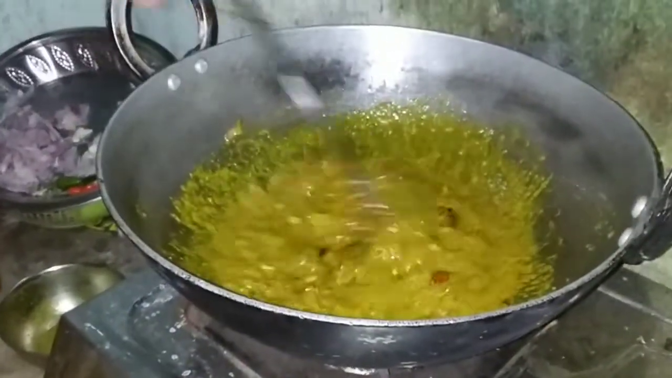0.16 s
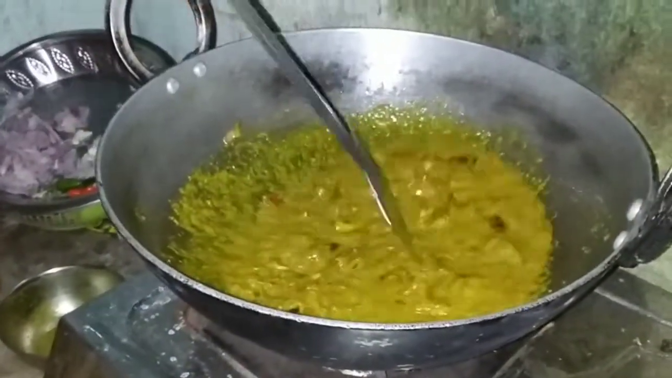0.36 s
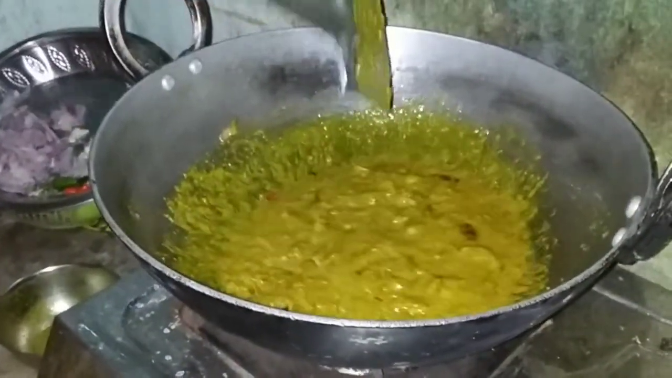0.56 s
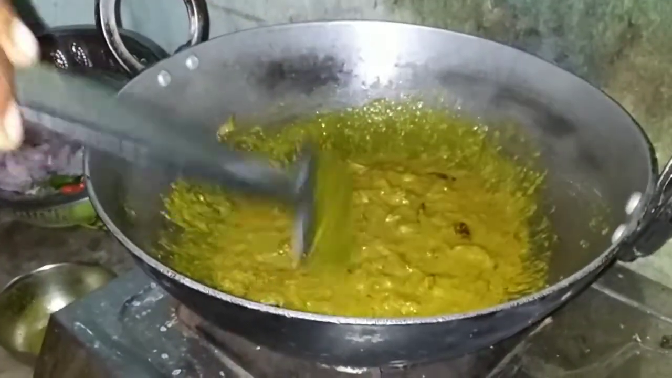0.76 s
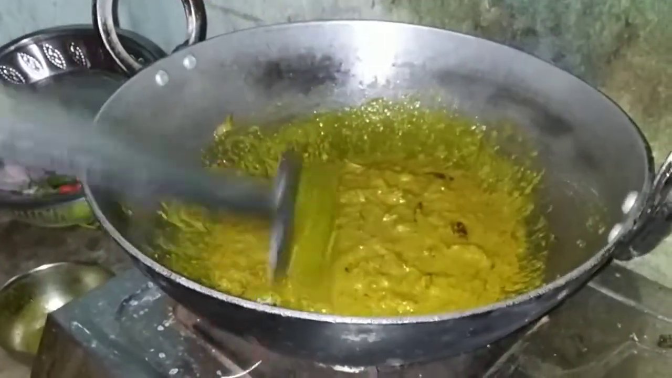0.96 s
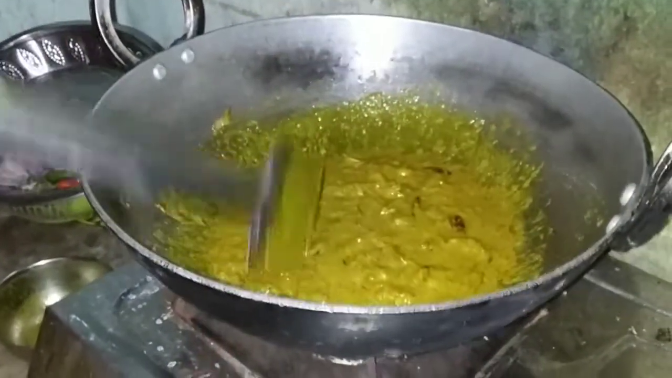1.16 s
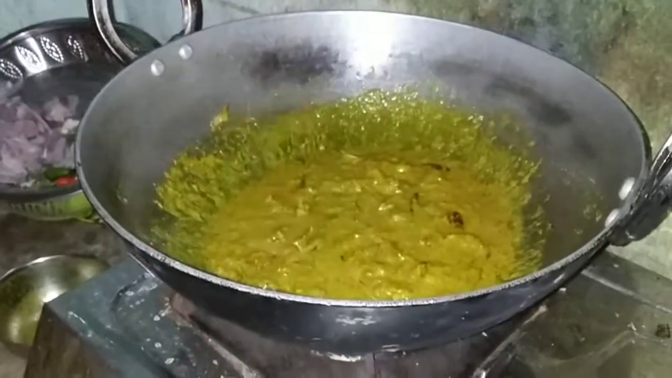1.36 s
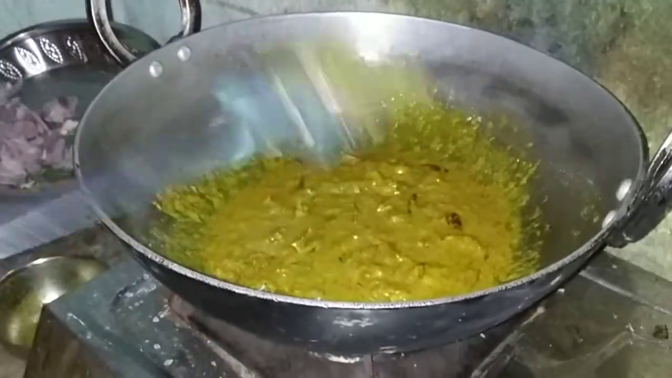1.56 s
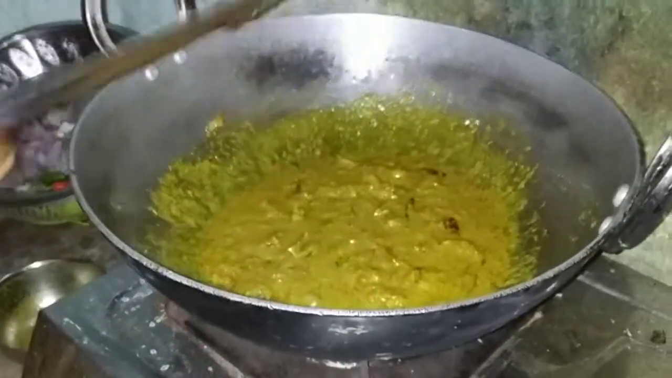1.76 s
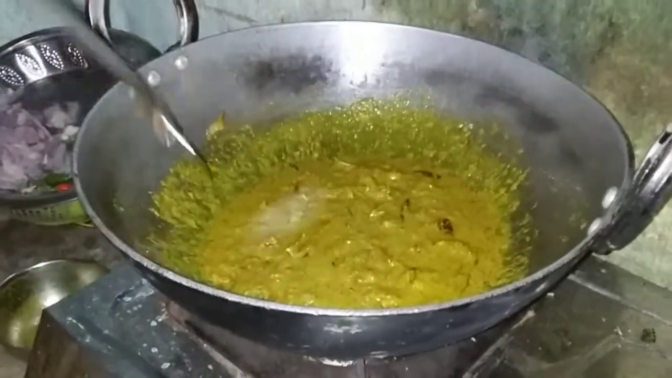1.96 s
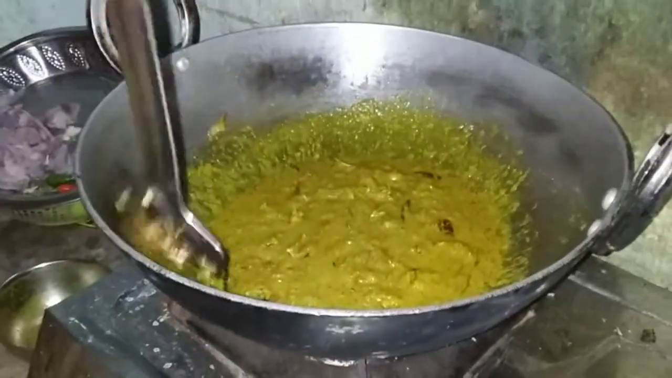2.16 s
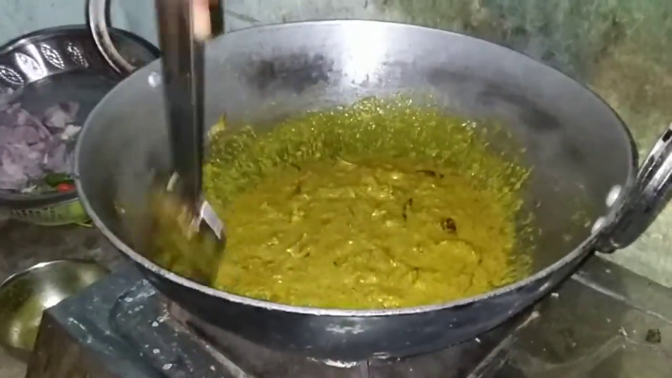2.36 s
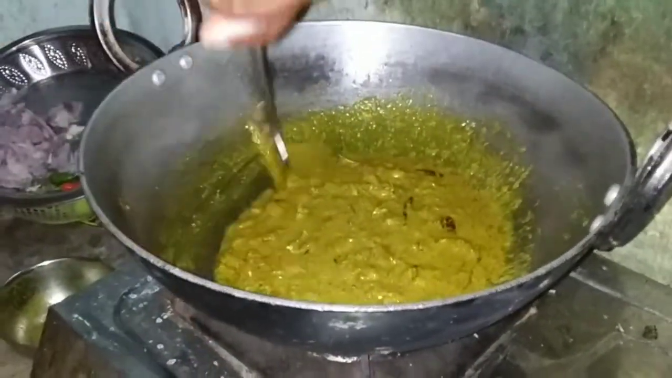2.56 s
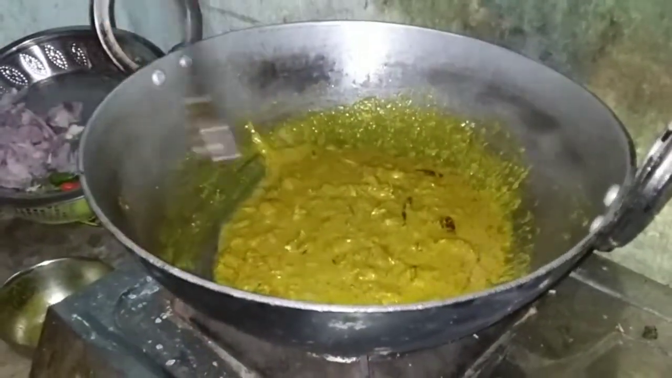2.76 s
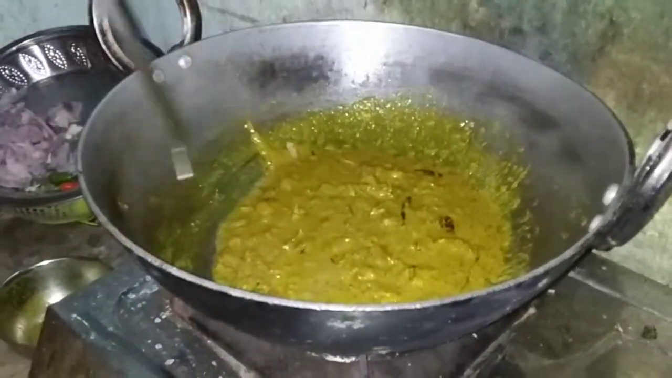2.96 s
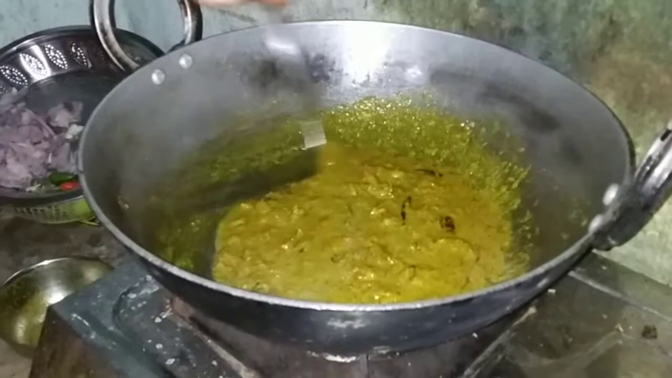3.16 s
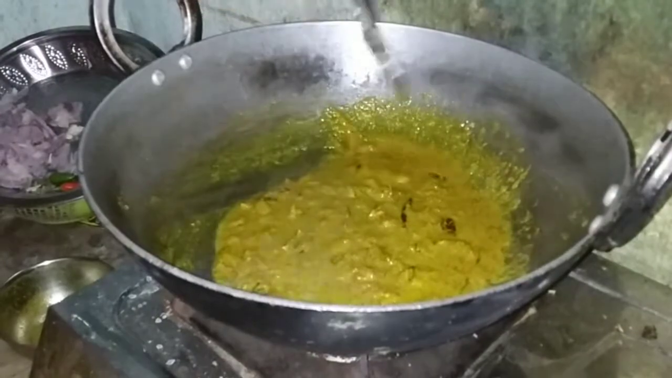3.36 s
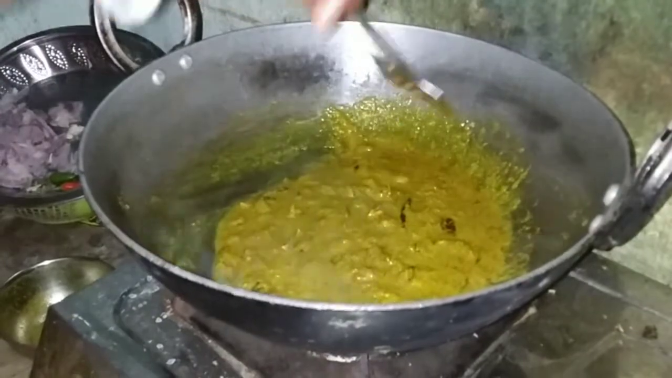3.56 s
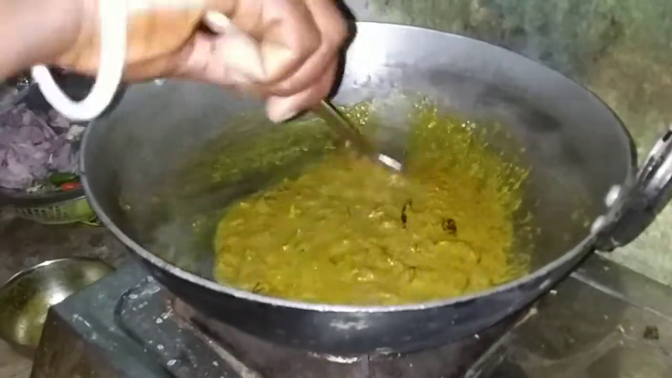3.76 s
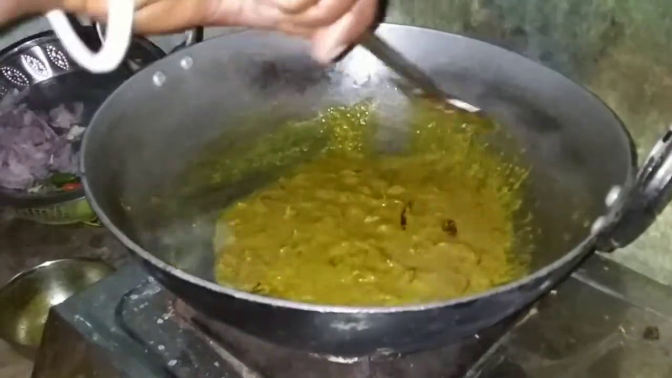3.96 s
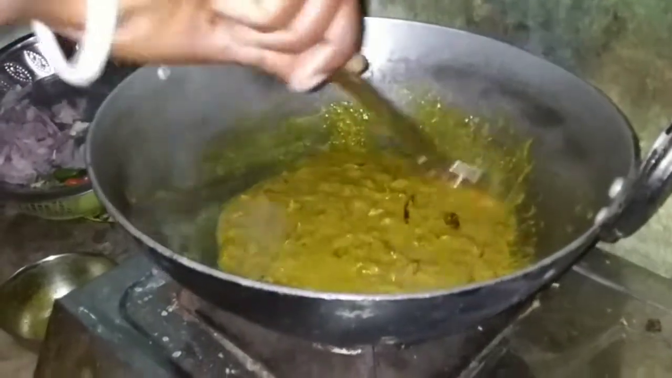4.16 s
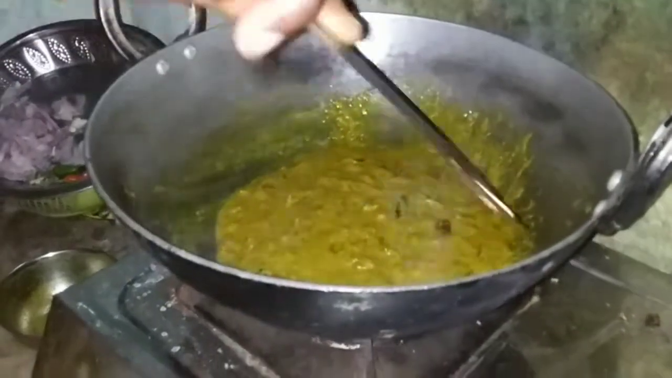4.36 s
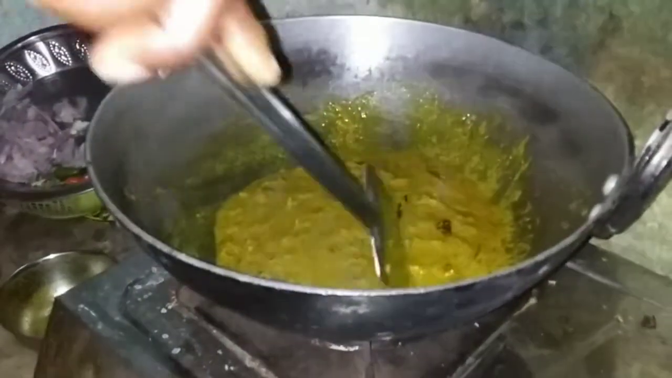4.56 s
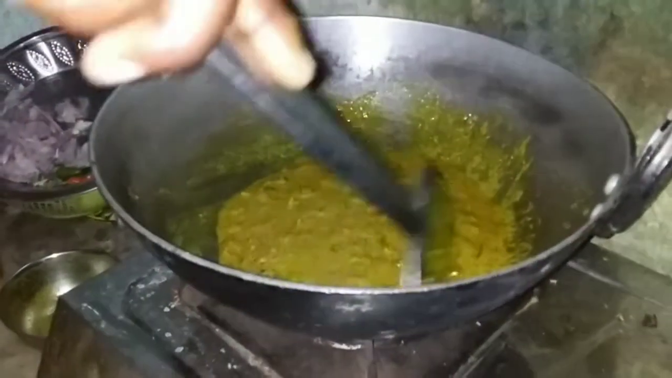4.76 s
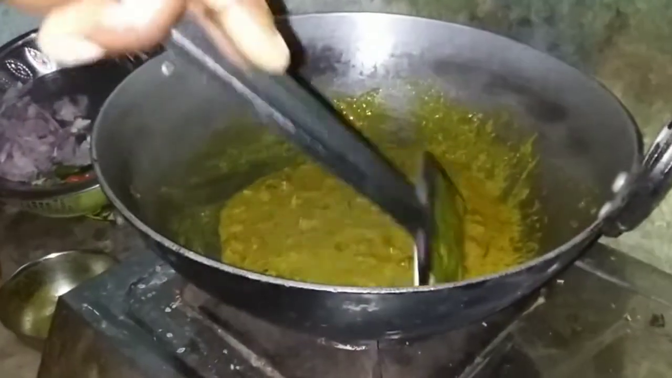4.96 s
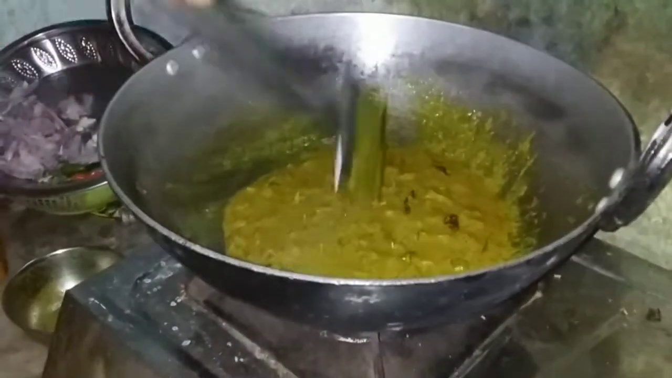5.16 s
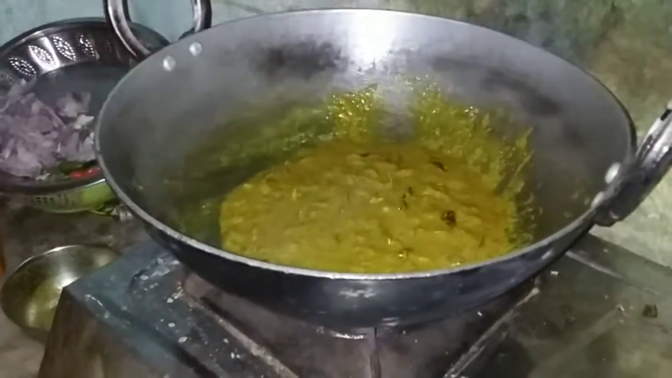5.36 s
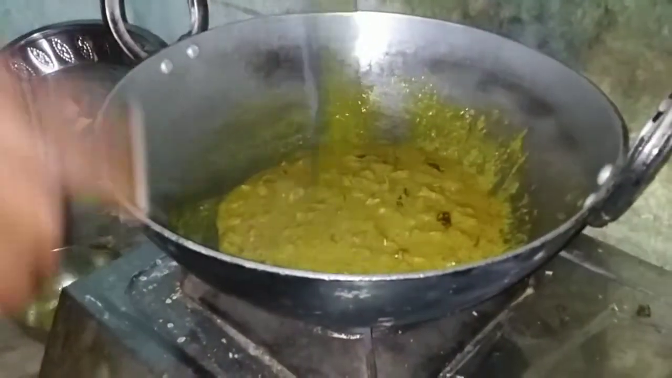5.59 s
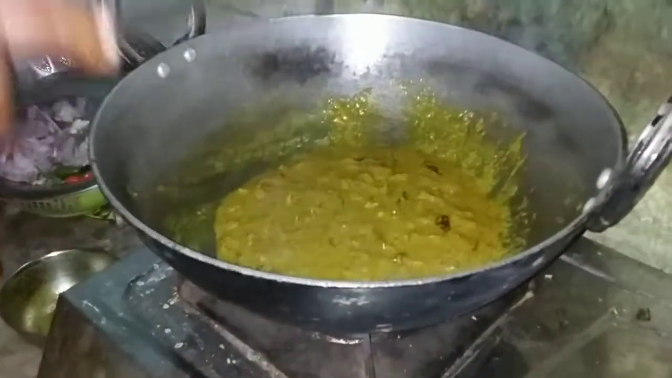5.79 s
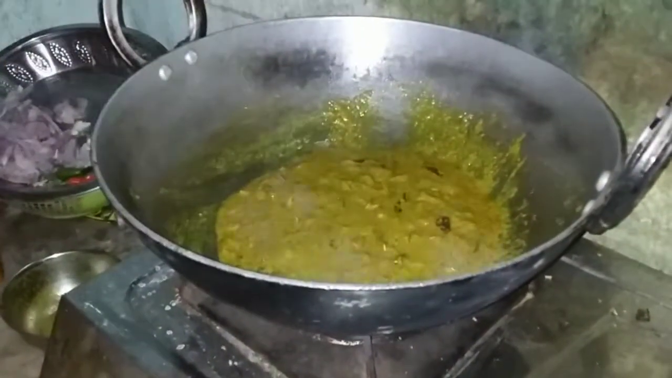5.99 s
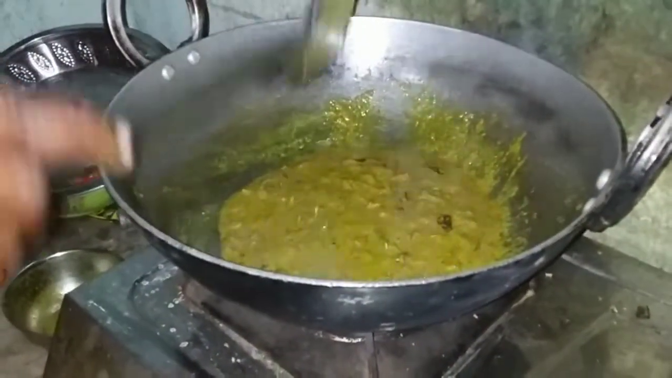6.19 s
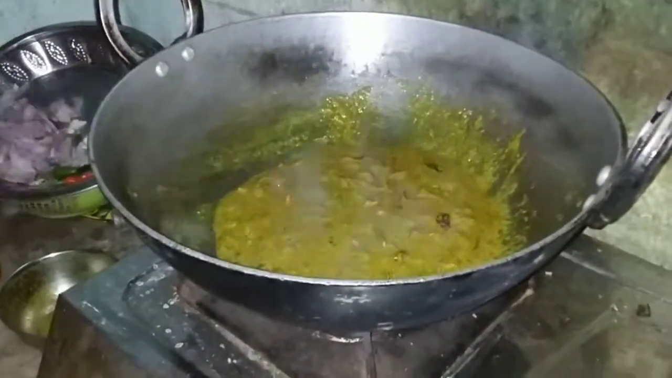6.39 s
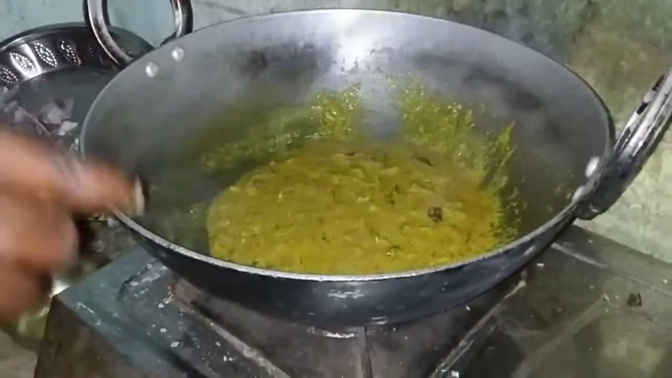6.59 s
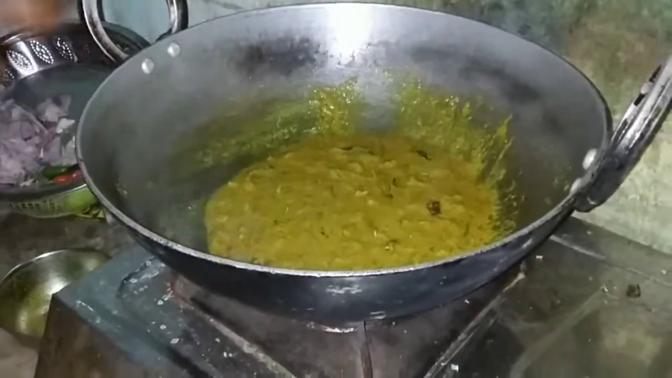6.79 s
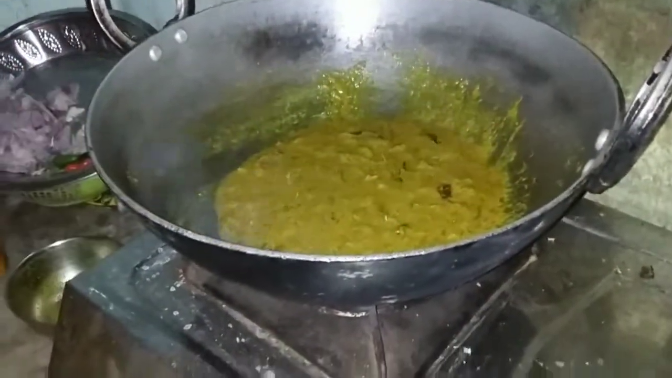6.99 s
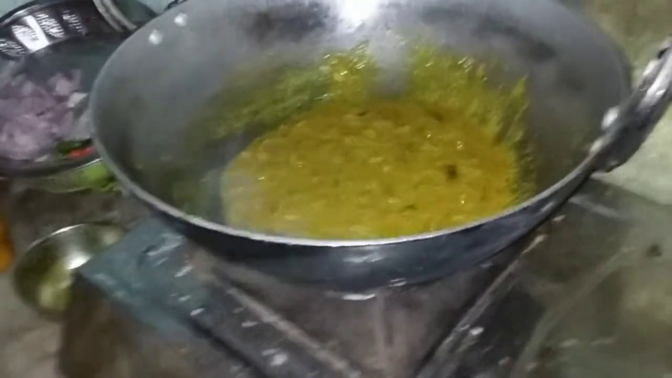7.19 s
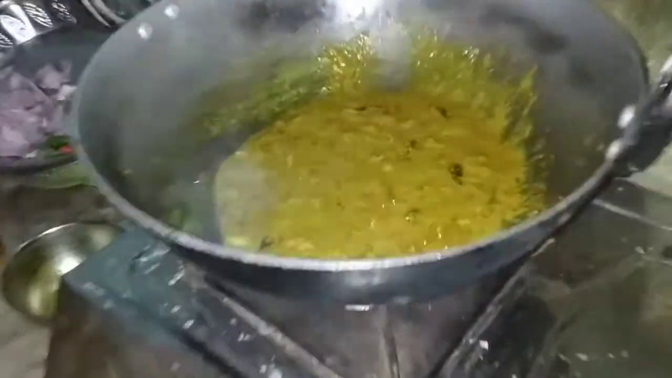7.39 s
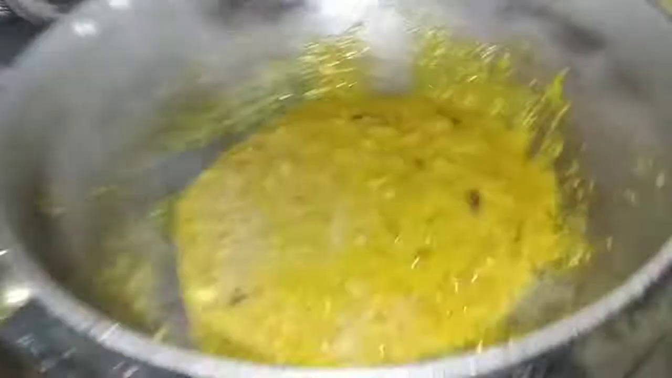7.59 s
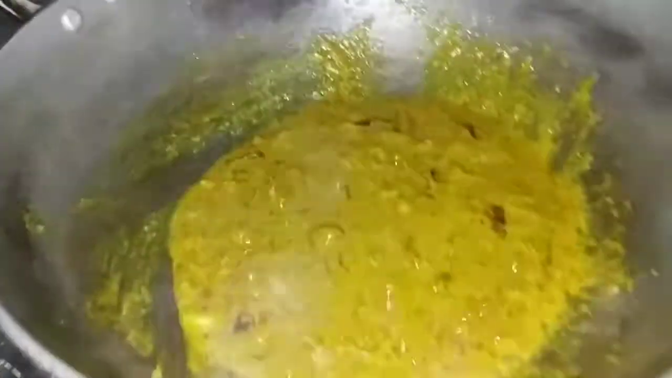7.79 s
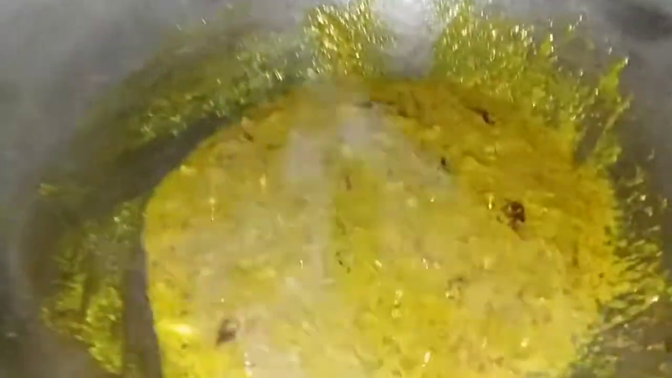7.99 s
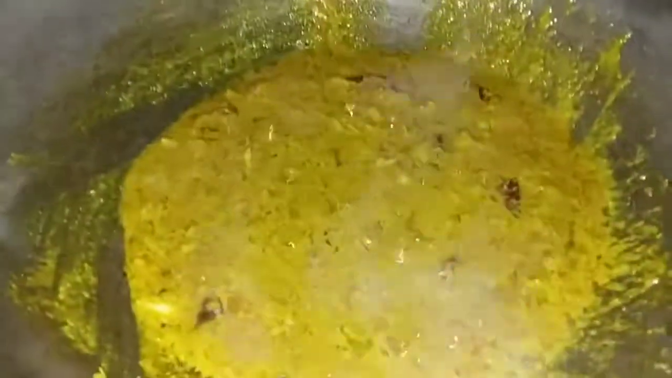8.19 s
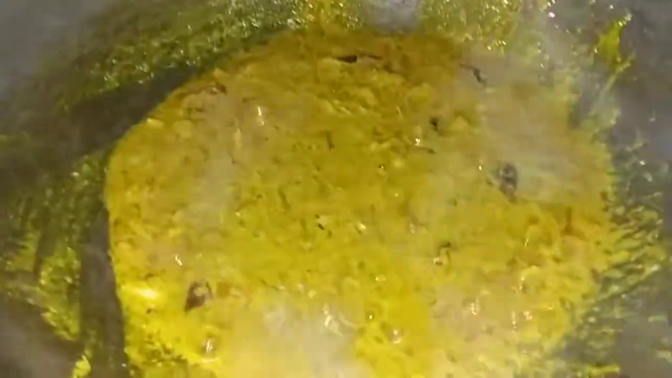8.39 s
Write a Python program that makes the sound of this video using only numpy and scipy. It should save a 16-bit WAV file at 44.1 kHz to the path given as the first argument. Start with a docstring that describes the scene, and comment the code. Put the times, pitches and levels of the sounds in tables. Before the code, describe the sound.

Close in a small hard-walled kitchen, oil crackles and thick paste bubbles in a metal wok over a low rumbling burner. A steel spatula gives three bright ringing knocks, then scrapes roughly along the bowl and clanks several more times, with hollow groans and dull clonks. After five seconds the stirring stops; the sizzle swells with spits and plops as the phone microphone moves in, ending with two soft handling bumps.

```python
"""Spice paste frying in a metal wok

A small kitchen with a gas stove; a phone with two microphone ports, about half a metre above the pan.
Random clicks with pan and room echo make the crackling oil, rising sine rings the bubbles, noise the burner.
A steel spatula strikes ten times and scrapes on: a chattering, stick-slip force rings resonances of the wok.
Tinks, hollow groans and clonks join in. The sizzle grows, the phone moves in, and the hand bumps it twice."""
import sys
import numpy as np
from scipy import signal
from scipy.fft import rfft, irfft, next_fast_len
from scipy.io import wavfile

SR = 44100
rng = np.random.default_rng(int(sys.argv[2]) if len(sys.argv) > 2 else 0)


def master_out(mix):
    """Clip the mix to full scale and print it as 16-bit PCM to the path in sys.argv[1]."""
    frames = np.transpose(np.atleast_2d(mix))
    ceiling = np.clip(frames, -1, 1)
    pcm = np.round(ceiling * 32767).astype(np.int16)
    wavfile.write(sys.argv[1], SR, pcm)


N = 372204
TIME = np.arange(N) / SR  # s

# how hard the pan fries; it picks up once the paste is stirred: (time [s], relative level [dB])
FRYING_HEAT = [(0, 1.5), (2.05, -0.5), (2.6, 5), (4.4, 6.5), (6.4, 8.5), (7.3, 10), (8.44, 14)]
# oil runs onto hot metal and the crackle flares up: (centre time [s], rise [dB])
OIL_FLARES = [(1.42, 5.5), (3.28, 3), (6.86, 7), (7.56, 3.5), (7.73, 1.5), (7.92, 3.5)]
FLARE_S = 0.084  # from the centre to where the rise is 1/e
# the phone moves in over the pan: (time [s], distance [m])
PHONE_DISTANCE = [(7.35, 0.54), (8.05, 0.46)]
# colour of oil crackle: (frequency [Hz], gain [dB])
CRACKLE_COLOUR = [(1500, 5), (3500, 0.5), (5500, -2), (8500, 1), (12500, 4), (16000, -8.5)]
# colour of bubbling paste: (frequency [Hz], gain [dB])
BUBBLING_COLOUR = [(600, -30), (1100, -3), (1400, -8), (1850, 0.5), (2150, -5), (2430, -2), (2900, -3),
                   (3500, -6), (4300, -10.5), (7000, -15.5)]
# colour of the low simmer: (frequency [Hz], gain [dB])
SIMMER_COLOUR = [(90, -19), (170, -8), (260, 4.5), (450, 4), (700, -6.5), (1100, -3), (2000, -17)]
# colour of the burner rumble: (frequency [Hz], gain [dB])
BURNER_COLOUR = [(12, -13.5), (25, 7.5), (32, -11.5), (41, 2), (52, -1.5), (75, -9), (150, -13.5),
                 (220, -22), (400, -34), (900, -42.5)]
# light, high metal tinks: (time [s], peak level [dB])
METAL_TINKS = [(0.121, -21.5), (.797, -26.5), (1.197, -43), (5.578, -18), (6.249, -21)]
# what a tink rings with: (frequency [Hz], energy level [dB], time to fall 60 dB [s])
TINK_RING = [(5800, -7, 0.047), (10120, 5, 0.08), (10950, 13.5, 0.055), (11600, 4, 0.027), (13600, 0, .02),
             (15700, -2, .02)]
# the blade lands, ten clear blows and three faint touches: (time [s], relative level of the edge above 3 kHz [dB],
# of the blade 0.7-3 kHz [dB], of the bowl below 700 Hz [dB], chatter [s],
# deepest resonance of this spot of the wok [Hz], cluster that this grip favours [Hz])
BLOWS = [(0.6645, -11.5, -16.5, -26.5, 0.0042, 188, 5270), (0.8524, -8.5, -15, -33, 0.0029, 160, 5200),
         (1.05, -7.5, -14.5, -33.5, 0.0031, 144, 8750), (1.995, -45, -43, -58, 0.0017, 150, 5200),
         (2.149, -13, -30, -37.5, 0.011, 250, 6140), (2.8156, -12, -29, -37.5, 0.0071, 250, 4220),
         (2.848, -44, -34, -38, 0.011, 256, 4260), (3.537, -19, -17.5, -25, 0.003, 430, 5550),
         (4.04, -13.5, -18, -23.5, 0.003, 420, 2660), (4.356, -8.5, -16, -25, 0.0031, 175, 4270),
         (4.666, -60, -42, -47, 0.0026, 175, 2580), (4.699, -12, -20, -26.5, 0.0069, 175, 2520),
         (4.951, -10.5, -18, -28, 0.0054, 190, 4430)]
# the blade slides on after a blow: (bite time [s], lift time [s], relative level at the lift of the edge [dB],
# of the blade [dB], of the bowl [dB], edge swell [dB/s], release [dB/s])
SLIDES = [(0.69, 0.71, -31, -31.5, -31, 0, 300), (0.873, 0.901, -30.5, -31, -32, 0, 253),
          (1.082, 1.089, -29, -28.5, -30, 2, 215), (2.253, 2.433, -16, -30.5, -37.5, 51.5, 510),
          (2.894, 3.11, -25.5, -33.5, -36.5, 1, 587), (3.616, 3.681, -27, -33, -47, -35, 327.9),
          (4.091, 4.148, -18, -24, -36.5, 15, 680), (4.392, 4.464, -27.5, -28, -34.5, 30, 493),
          (4.7, 4.774, -31, -34, -35, -13, 580), (4.968, 5.003, -26, -28.5, -36.5, 5, 500)]
# the scraping blade catches for a few milliseconds and all its ranges get louder: (centre time [s], rise [dB])
BLADE_CATCHES = [(2.305, 0.5), (2.41, 1.5), (4.135, 1)]
# the wok's low modes: (frequency before detuning [Hz], energy level [dB], time to fall 60 dB [s])
WOK_LOW_MODES = [(245.7, -3.5, 0.4), (323.6, -0.5, 0.22), (371, -3, 0.26), (564, -8, 0.11),
                 (785, -1, 0.087), (1107, -1, 0.092), (1387, -2, 0.15)]
# higher modes of the wok crowd into clusters: (centre before drift [Hz], width [Hz], rise [dB])
HIGH_CLUSTERS = [(2700, 230, 6), (3280, 290, 5.5), (4100, 370, 8), (5130, 490, 3.5), (5750, 510, 5.5),
                 (8500, 240, 0.5), (9600, 230, 2.5), (12070, 280, 3.5)]
# colour of steel on the wok: (frequency [Hz], gain [dB])
STEEL_COLOUR = [(140, 2.5), (250, 6.5), (430, -5), (580, 6), (720, -9.5), (1150, -2.5), (1800, -4),
                (3200, -8.5), (5600, 3), (8000, 4), (11500, 2), (14000, -2.5), (16000, -9)]
# the loosely held spatula sings after the first and last three knocks: (time [s], level before its envelope [dB])
SPATULA_SINGS = [(0.687, -22.5), (0.884, -18.5), (1.081, -24), (4.392, -28), (4.713, -25), (4.96, -25.5)]
# the flat of the blade groans through the paste: (time [s], length [s], low resonance level before its swell [dB],
# upper resonance level before its swell [dB], low resonance at the start [Hz], at the end [Hz])
PASTE_GROANS = [(2.378, 0.14, -35.5, -40, 590, 575), (2.5, 0.18, -59, -51, 620, 590),
                (3.035, 0.099, -34.5, -31.5, 345, 318), (3.538, 0.2, -34, -29, 680, 566),
                (4.045, 0.15, -36.5, -36, 640, 540)]
# single spits of oil: (time [s], peak level [dB])
OIL_SPITS = [(3.215, -20), (3.811, -22), (4.255, -17.5), (5.942, -18.5), (6.494, -23), (6.656, -15),
             (7.886, -19), (7.95, -18), (8.261, -17)]
# the blade lands flat and the paste chokes its ring to a short clonk:
# (time [s], starting level [dB], frequency [Hz], time to fall 60 dB [s])
FLAT_CLONKS = [(3.538, -6, 1060, 0.031), (4.0414, -16.5, 846, 0.042), (4.699, -12, 940, 0.014),
               (4.9525, -14, 850, 0.016)]
# big bubbles burst in the paste: (time [s], peak level [dB], starting pitch [Hz])
PASTE_PLOPS = [(4.275, -28, 2500), (5.6168, -26, 1830), (5.764, -27, 1850), (6.167, -26.5, 1780),
               (6.468, -28, 2400), (6.5076, -29, 1820), (6.994, -29, 1860), (7.2342, -16.5, 2650),
               (7.3085, -26.5, 2900), (7.6603, -26.5, 1650), (7.688, -22.5, 2920), (7.8168, -21, 2820),
               (8.0606, -19.5, 3050), (8.338, -22, 2400)]
# bumps of the hand: (time [s], peak level [dB], decay to 1/e [s])
HAND_BUMPS = [(8.14, -19.5, 0.019), (8.338, -23.5, 0.03)]
# colour of the bumps: (frequency [Hz], gain [dB])
HAND_COLOUR = [(60, -31), (150, 5.5), (220, -1), (350, -2.5), (620, -4.5), (900, -16), (2500, -31)]
# the two microphone ports: (frequency [Hz], left minus right [dB])
PORT_BALANCE = [(380, 0.7), (700, -1), (1290, 4), (2380, 5), (4400, 0), (8120, -2.5), (13000, 9)]

# edge, blade and bowl ranges
RANGES = [signal.butter(4, band, "bandpass", fs=SR, output="sos")
          for band in [(3000, 16000), (700, 3000), (80, 700)]]
CATCH_S = 0.0036  # from the centre to where the rise is 1/e
BITE_DB_PER_S = 370  # how fast the pressure builds before the blade bites
# sliding down towards the floor of the wok, the blade sounds ever fuller
BLADE_SWELL_DB_PER_S, BOWL_SWELL_DB_PER_S = 41, 75
BOWL_RELEASE_SHARE = 0.63  # the bowl lets go more slowly than the edge
# every blow skids briefly: level against the blow (edge, blade, bowl), and how fast that dies
SKID_DB, SKID_DB_PER_S = (-17, -16, -2.5), 301
# after the third knock the wok rocks and rattles on its stand; relative levels of edge, blade and bowl
RATTLE_S, RATTLE_DB, RATTLE_HZ, RATTLE_DB_PER_S = 1.135, (-64, -40, -37.5), 15, 103
CEILING, TOP_HZ = .9, 15900  # amplitude limit and upper band edge of the phone


def undb(db):
    """Turn dB into an amplitude factor."""
    return 10 ** (np.asarray(db) / 20)


def unit(x):
    """Scale to rms 1."""
    return x / np.sqrt(np.mean(x ** 2))


def peaked(sound, db):
    """Scale to a peak level."""
    return undb(db) * sound / np.abs(sound).max()


def shape(x, gain):
    """Filter by a gain given as a function of frequency."""
    n = x.shape[-1]
    size = next_fast_len(n + 4096)
    hz = np.maximum(np.arange(size // 2 + 1) * SR / size, 1)
    return irfft(rfft(x, size) * gain(hz), size)[..., :n]


def slope(f, points):
    """Read (Hz, value) points on a log-frequency axis."""
    hz, value = np.transpose(points)
    return np.interp(np.log(f), np.log(hz), value)


def colour(x, points):
    """Filter by (Hz, dB) points."""
    return shape(x, lambda f: undb(slope(f, points)))


def spread(pair, shared_hz=900):
    """Two unrelated signals become left and right: the long waves reach both ports alike."""
    side = shape(pair[1], lambda f: np.hypot(f, shared_hz / 10) / np.hypot(f, shared_hz))
    return np.array([pair[0] + side, pair[0] - side])


def convolve(x, response):
    """Let a sound ring through a response."""
    return signal.fftconvolve(np.atleast_2d(x), response, axes=1)[:, :N]


def add(out, s, sound):
    """Mix a sound in at time s."""
    i = int(s * SR)
    out[..., i:i + sound.shape[-1]] += sound[..., :N - i]


def walk(rate):
    """Slow chance with a spread near 1, drawn anew rate times a second."""
    knots = rng.standard_normal(int(N / SR * rate) + 2)
    return 1.73 * np.interp(TIME * rate, np.arange(len(knots)), knots)


def clicks(rate, scatter_db):
    """Random clicks of either sign, about rate a second, their sizes scattered exponentially in dB; rms 1."""
    size = undb(scatter_db * np.minimum(rng.exponential(size=N), 5))
    return unit((rng.random(N) < rate / SR) * size * rng.choice([-1, 1], N))


def fade(t60, length):
    """An exponential decay, 60 dB down after t60 seconds."""
    return np.exp(-np.log(1000) * TIME[:int(length * SR)] / t60)


def wash(t60, length):
    """Decaying noise for countless overlapping resonances or echoes at the two ports, with energy near 1."""
    decay = fade(t60, length)
    return spread(rng.standard_normal((2, len(decay)))) * decay / np.sqrt(2 * np.sum(decay ** 2))


def ring(modes, length):
    """One decaying stereo tone per mode, weighted by energy; the higher ones reach the ports out of step."""
    t, tones = TIME[:int(length * SR)], []
    for hz, db, t60 in modes:
        turn = np.array([[1], [-1]]) * rng.choice([-1, 1]) * np.pi / 4 * min(hz / 1800, 1)
        unit_energy = np.sqrt(4 * np.log(1000) / t60 / SR)
        tones.append(undb(db) * unit_energy * np.sin(2 * np.pi * hz * t + turn) * fade(t60, length))
    return np.array(tones)


def pan_echo(bowl_db=-5, room_db=-18):
    """A pop comes straight from its place, then off the bowl of the wok, then off the kitchen walls."""
    direct, bowl, room = (wash(t60, .12) for t60 in (.0015, .055, .22))
    return direct + undb(bowl_db) * bowl + undb(room_db) * room


def scattered(x, count=4):
    """Share pops out over several places in the pan, each with its own echo."""
    place = rng.integers(count, size=N)
    return sum(signal.oaconvolve([x * (place == k)], pan_echo(), axes=1)[:, :N] for k in range(count))


def bubble(hz, cycles, glide=0.049):
    """A short ring whose pitch rises as the bubble opens; it dies to 1/e in the time of the given cycles."""
    age = TIME[:int(6 * cycles / hz * SR)] * hz / cycles  # in decay times
    return np.sin(2 * np.pi * cycles * age * (1 + glide * age / 2)) * np.exp(-age)


def frying(crackle_db=-57.5, bubbling_db=-64.0, simmer_db=-62.0, bubbling_growth=1.11, simmer_growth=0.97):
    """Water flashes to steam in the oil, a fine fizz with sharp snaps, while bubbles open all over the paste."""
    heat = np.interp(TIME, *np.transpose(FRYING_HEAT))  # dB, added to the three base levels
    flare = sum(db * np.exp(-((TIME - s) / FLARE_S) ** 2) for s, db in OIL_FLARES)
    nearness = PHONE_DISTANCE[0][1] / np.interp(TIME, *np.transpose(PHONE_DISTANCE))

    flicker = undb(2.1 * walk(45) + 1.46 * walk(260))
    fizz = scattered(clicks(6000, scatter_db=-2) * flicker)
    snaps = scattered(clicks(380, scatter_db=3.1))
    snaps = shape(snaps, lambda f: f / np.hypot(f, 7000))  # tiny droplets give mostly treble
    crackle = unit(colour(unit(fizz) + .7 * unit(snaps), CRACKLE_COLOUR))

    bubbles = np.zeros((2, N))
    for when, pitch, length, size, place in rng.random((3000, 5)):
        sound = (size + .03) ** -.42 * bubble(1250 * 3.2 ** pitch, .8 + 2.2 * length)
        pan = [np.cos(np.pi * place), np.sin(np.pi * place)]
        add(bubbles, when * N / SR, np.outer(pan, sound))
    bursting = scattered(clicks(260, scatter_db=3))
    patches = undb(.7 * walk(22))  # the bubbling comes and goes a little
    mixture = unit(bubbles) + unit(bursting) + unit(fizz)
    bubbling = unit(colour(mixture, BUBBLING_COLOUR) * patches)

    simmer = unit(colour(spread([clicks(900, scatter_db=0.0) for _ in range(2)]), SIMMER_COLOUR))
    return nearness * (crackle * undb(crackle_db + heat + flare)
                       + bubbling * undb(bubbling_db + bubbling_growth * heat)
                       + simmer * undb(simmer_db + simmer_growth * heat))


def burner(db=-46, whistle_hz=598, whistle_db=-67):
    """Coloured noise for the low, unsteady rumble under the pan; narrow noise for a faint wavering whistle."""
    rumble = unit(colour(spread(rng.standard_normal((2, N))), BURNER_COLOUR)) * undb(db + walk(6.6))
    whistle = shape(rng.standard_normal(N), lambda f: 1 / (1 + ((f - whistle_hz) / 20) ** 2))
    return rumble + undb(whistle_db) * unit(whistle)


def tinks(tick_db=1):
    """Light touches of metal: a noisy tick and a thin, high ring of decaying modes."""
    out = np.zeros((2, N))
    for s, db in METAL_TINKS:
        tick = colour(wash(0.42, .5), CRACKLE_COLOUR)
        sound = ring(TINK_RING, .5).sum(axis=0) + undb(tick_db) * tick
        add(out, s, peaked(sound, db))
    return out


def chatter(duration):
    """A hard blow smeared over a few milliseconds of chatter; it holds all frequencies alike."""
    envelope = np.exp(-(TIME[:int(4 * duration * SR)] / duration) ** 2)
    spectrum = rfft(envelope * rng.standard_normal(len(envelope)))
    return irfft(spectrum / np.abs(spectrum), len(envelope)) * np.sqrt(np.sum(envelope ** 2))


def stroke(bite, lift, levels, swell, release):
    """Pressure of one scrape in each range: it builds, changes as the blade slides, and falls as it lifts."""
    swells = [swell, BLADE_SWELL_DB_PER_S, BOWL_SWELL_DB_PER_S]
    releases = [release, release, release * BOWL_RELEASE_SHARE]
    landed = max(row[0] for row in BLOWS if row[0] < bite)
    t = landed + TIME[:int(.7 * SR)]
    building = BITE_DB_PER_S * np.maximum(bite - t, 0)
    sliding = np.outer(swells, np.maximum(lift - t, 0))
    lifting = np.outer(releases, np.maximum(t - lift, 0))
    return landed, undb(np.array(levels)[:, None] - building - sliding - lifting)


def blade_force(strike_db=-2.5, scrape_db=-.5):
    """The blade chatters as it lands, skids, then sticks and slips over the rough metal; one row a range."""
    friction = unit(clicks(3000, scatter_db=1.1) * undb(1.3 * walk(260) + 0.5 * walk(35)))
    blow, power = np.zeros((2, 3, N))  # power of the rubbing
    skid = undb(-SKID_DB_PER_S * TIME[:SR // 5])
    for s, *levels, duration, _, _ in BLOWS:
        add(blow, s, np.outer(undb(levels), chatter(duration)))
        add(power, s, np.outer(undb(levels) * undb(SKID_DB), skid) ** 2)
    for bite, lift, *levels, swell, release in SLIDES:
        s, pressure = stroke(bite, lift, levels, swell, release)
        add(power, s, pressure ** 2)
    t = TIME[:SR // 3]
    rocking = undb(-RATTLE_DB_PER_S * t) * (1 + 0.91 * np.cos(2 * np.pi * RATTLE_HZ * t))
    add(power, RATTLE_S, np.outer(undb(RATTLE_DB), rocking) ** 2)
    catch = sum(db * np.exp(-((TIME - s) / CATCH_S) ** 2) for s, db in BLADE_CATCHES)
    return undb(strike_db) * blow + undb(scrape_db + catch) * np.sqrt(power) * friction


def treble_ripple(ripple_db=5.0, spacing_hz=60):
    """Random ripple in dB over frequency, drawn once per blow, makes the steel's treble uneven."""
    hz = np.arange(400) * spacing_hz
    db = ripple_db * np.clip(rng.standard_normal(len(hz)), -2, 1) * np.minimum(hz / 3000, 1)
    return lambda f: np.interp(f, hz, db)


def clusters(favoured_hz, favour_db=4, favour_width_hz=380, drift=0.013):
    """High clusters drift as the blade moves, and its grip favours one: dB as a function of frequency."""
    favoured = (favoured_hz, favour_width_hz, favour_db)
    rows = [(hz * (1 + drift * rng.standard_normal()), width, db)
            for hz, width, db in [*HIGH_CLUSTERS, favoured]]
    return lambda f: sum(db / (1 + (2 * (f - hz) / width) ** 4) for hz, width, db in rows)


def wok_spot(tones, ripple, deepest_hz, favoured_hz, dense_db=-4, room_db=-16, modes_db=-23, deepest_q=0.92):
    """What a click at one spot of the wok sets ringing, split into edge, blade and bowl ranges."""
    length, crowding = tones.shape[-1] / SR, clusters(favoured_hz)
    # each spot pushes a mode one way or the other
    modes = np.tensordot(rng.choice([-1, 1], len(tones)), tones, 1)
    body = wash(0.021, length) + undb(dense_db) * wash(0.095, length)
    body = body + undb(room_db) * wash(0.27, length) + undb(modes_db) * modes

    def response(f):
        """High on the wall the wok is stiff: little sounds below that spot's deepest resonance."""
        stiffness = 1 - (deepest_hz / f) ** 2 - 1j * deepest_hz / f / deepest_q
        return undb(slope(f, STEEL_COLOUR) + crowding(f) + ripple(f)) / stiffness

    body = shape(body, response)
    parts = [signal.sosfilt(sos, body) for sos in RANGES]
    return [part / np.sqrt(np.sum(part.mean(axis=0) ** 2)) for part in parts]


def spatula(detune=.012):
    """As the blade travels, each short piece of its force rings a new spot of the wok, a little out of tune."""
    force, out = blade_force(), np.zeros((2, N))
    spots = [(s, treble_ripple(), deepest_hz, favoured_hz) for s, *_, deepest_hz, favoured_hz in BLOWS]
    hop = int(.06 * SR)
    window = np.sqrt(np.hanning(2 * hop))  # overlapping pieces keep their power
    for i in range(0, N - 2 * hop, hop):
        piece = force[:, i:i + 2 * hop] * window
        landed = [spot for s, *spot in spots if s * SR < i + 2 * hop]
        if landed and np.abs(piece).max() > 1e-4:
            modes = [(hz * (1 + detune * rng.standard_normal()), db, t60) for hz, db, t60 in WOK_LOW_MODES]
            tones = ring(modes, .24)
            for push, response in zip(piece, wok_spot(tones, *landed[-1])):
                add(out, i / SR, convolve(push, response))
    return out


def clashes(clash_db=-5, brevity=0.78):
    """The instant of contact reaches the ports directly: one brief, steel-coloured clash for each blow."""
    out = np.zeros((2, N))
    for s, *levels, duration, _, _ in BLOWS:
        pair = [np.pad(chatter(brevity * duration), (0, SR // 20)) for _ in range(2)]
        burst = colour(spread(pair), STEEL_COLOUR)
        for db, sos in zip(levels, RANGES):
            part = signal.sosfilt(sos, burst)
            strength = np.sqrt(duration * SR / np.sum(part.mean(axis=0) ** 2))
            add(out, s, undb(db + clash_db) * part * strength)
    return out


def singing(hz=1372, t60=0.29, swell=0.0035, turn=0.98):
    """One clear bending tone of the spatula swells in milliseconds, then dies; the ports hear it out of step."""
    out = np.zeros((2, N))
    t = TIME[:SR // 2]
    tone = np.sin(2 * np.pi * hz * t + np.array([[turn], [-turn]]))
    for s, db in SPATULA_SINGS:
        add(out, s, undb(db) * tone * (1 - np.exp(-t / swell)) * fade(t60, .5))
    return out


def resonate(x, hz, width_hz):
    """A steep resonance (double pole) whose centre moves; rms 1."""
    turn, pole = np.exp(2j * np.pi * np.cumsum(hz) / SR), np.exp(-np.pi * width_hz / SR)
    # shift the moving centre to zero frequency, smooth there, and shift back
    still = signal.lfilter([1], np.poly([pole, pole]), x / turn)
    return unit((still * turn).real)


def groans(width_hz=130, upper_ratio=1.69, upper_width_hz=650, fullness=1.0):
    """Friction rings a hollow resonance that sinks as the blade ploughs on, and a broader one above it."""
    out = np.zeros((2, N))
    friction = spread([clicks(2500, scatter_db=0.5) for _ in range(2)])
    for s, length, db, upper_db, start_hz, end_hz in PASTE_GROANS:
        along = np.linspace(0, 1, int(length * SR), endpoint=False)
        rub = friction[:, int(s * SR):][:, :len(along)]
        hz = start_hz + (end_hz - start_hz) * along
        low = undb(db) * resonate(rub, hz, width_hz)
        upper = undb(upper_db) * resonate(rub, upper_ratio * hz, upper_width_hz)
        add(out, s, (low + upper) * np.sin(np.pi * along) ** fullness)
    return out


def spits():
    """Single spits of oil stand out of the sizzle: one pop each, heard with its pan and room echo."""
    out = np.zeros((2, N))
    for s, db in OIL_SPITS:
        add(out, s, peaked(colour(pan_echo(), CRACKLE_COLOUR), db))
    return out


def clonks():
    """The flat of the blade gives one hollow tone that quickly dies, alike at both ports."""
    out = np.zeros(N)
    t = TIME[:SR // 5]
    for s, db, hz, t60 in FLAT_CLONKS:
        add(out, s, undb(db) * np.sin(2 * np.pi * hz * t) * fade(t60, 1)[:len(t)])
    return out


def plops():
    """Large bubbles burst in the paste and echo in the pan; small ones snap, larger ones ring on."""
    out = np.zeros((2, N))
    for s, db, hz in PASTE_PLOPS:
        sound = convolve(bubble(hz, cycles=3200 / hz), pan_echo(bowl_db=-7))
        add(out, s, peaked(colour(sound, BUBBLING_COLOUR), db))
    return out


def bumps():
    """Dull knocks of the hand on the phone: low noise that dies away exponentially."""
    out = np.zeros((2, N))
    for s, db, decay in HAND_BUMPS:
        t = TIME[:SR // 5]
        thud = colour(spread(rng.standard_normal((2, len(t)))), HAND_COLOUR)
        add(out, s, peaked(thud * np.exp(-t / decay), db))
    return out


def scene():
    """Frying, burner, spatula and bumps as they reach the two ports."""
    pan = frying() + burner() + spits() + plops()
    metal = tinks() + spatula() + clashes() + singing() + groans() + clonks()
    return pan + metal + bumps()


def record(dry):
    """Each port has its own colour; the phone rounds the loudest peaks and cuts the top."""
    def port(x, sign):
        """Tilt one port by its share of the left-right balance."""
        return shape(x, lambda f: np.sqrt(2 / (1 + undb(-2 * sign * slope(f, PORT_BALANCE)))))

    ports = np.array([port(x, sign) for x, sign in zip(dry, (1, -1))])
    rounded = CEILING * np.tanh(ports / CEILING)
    return signal.sosfilt(signal.ellip(10, .2, 70, TOP_HZ, fs=SR, output="sos"), rounded)


dry = scene()
out = record(dry)
master_out(out)
```